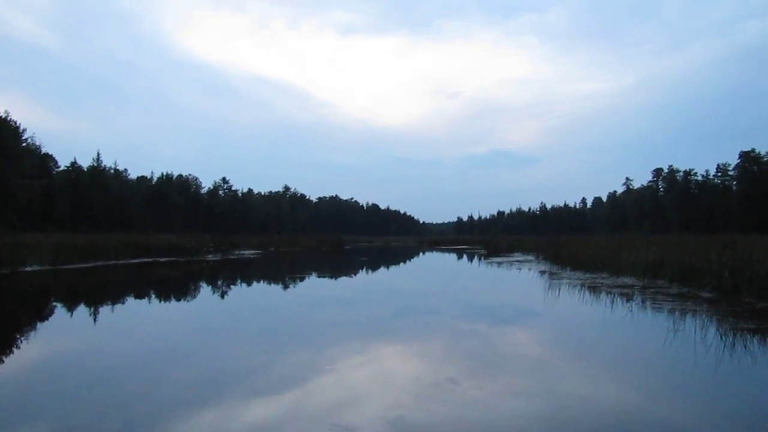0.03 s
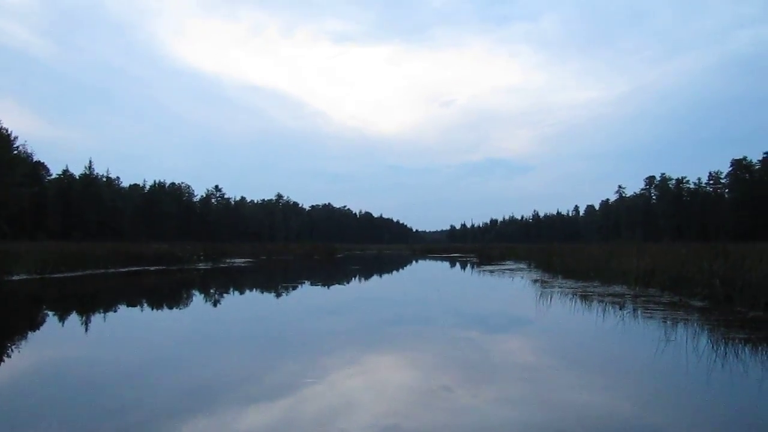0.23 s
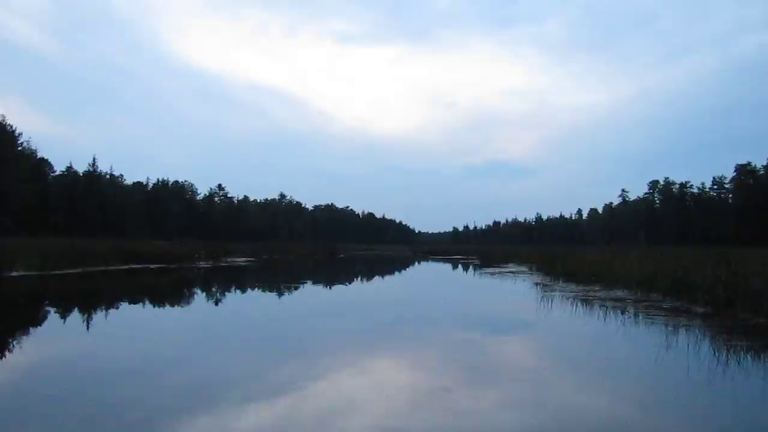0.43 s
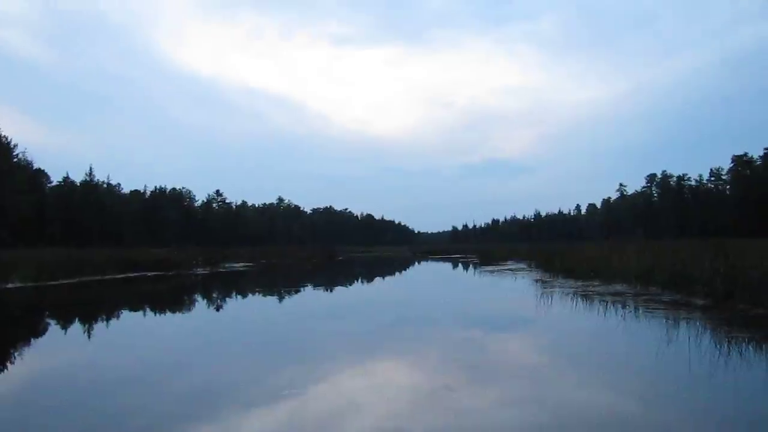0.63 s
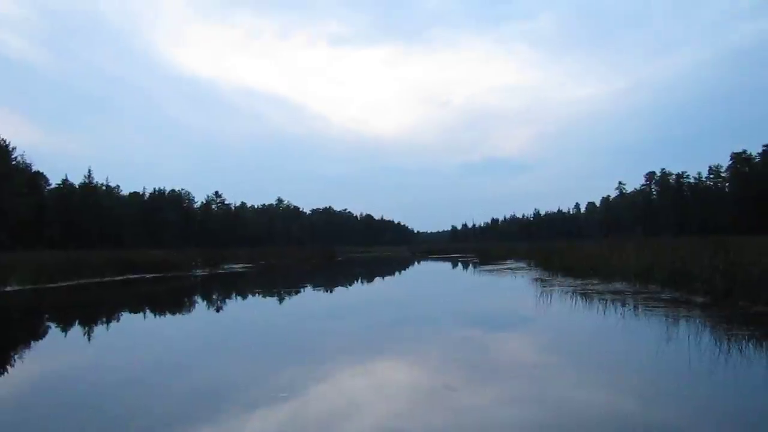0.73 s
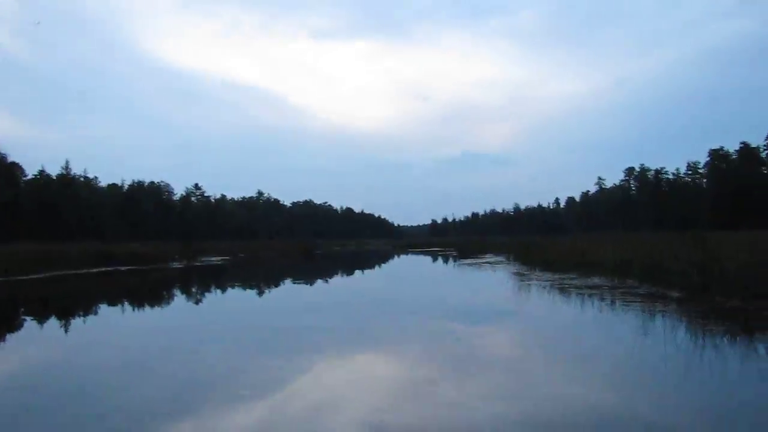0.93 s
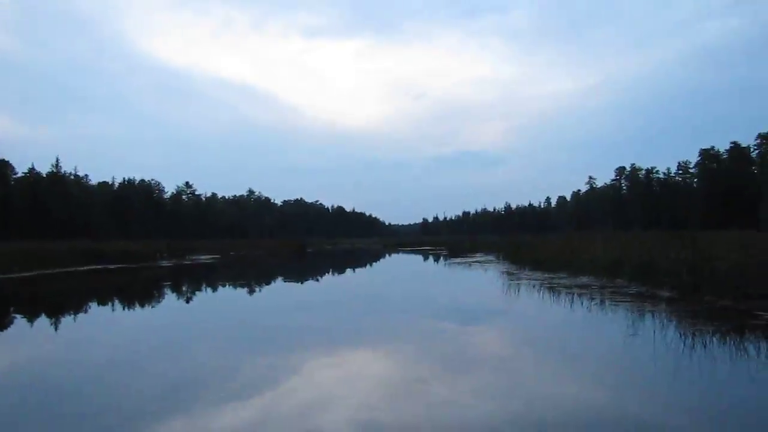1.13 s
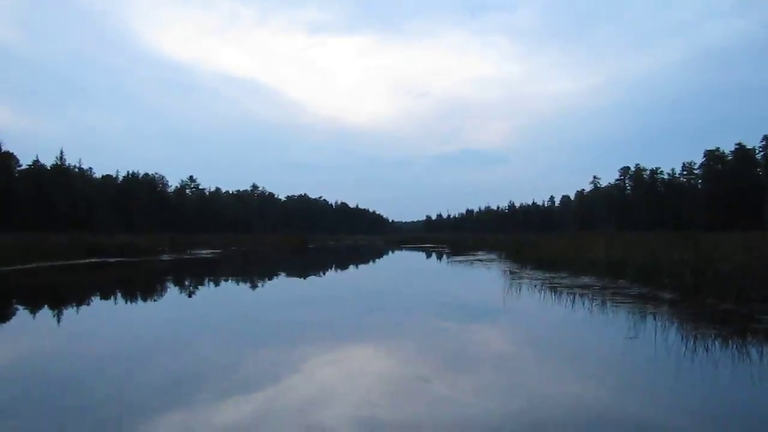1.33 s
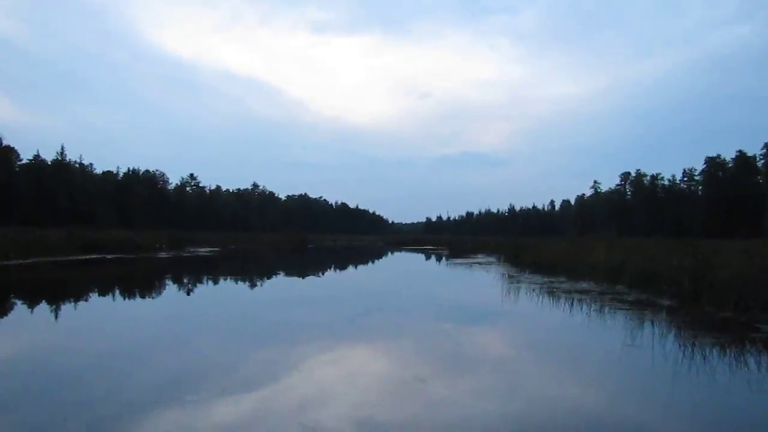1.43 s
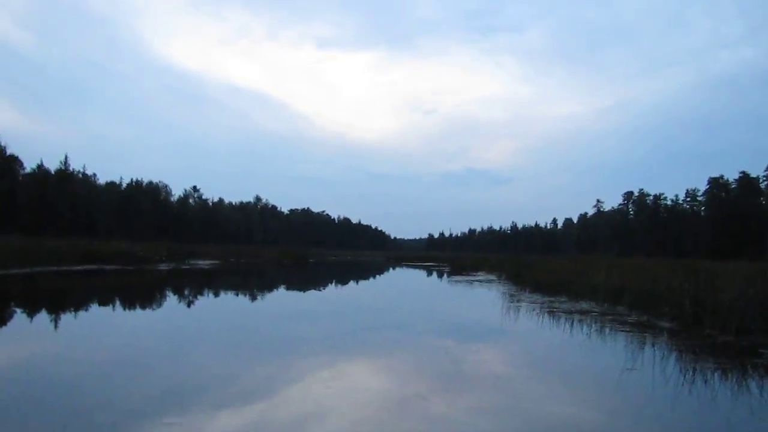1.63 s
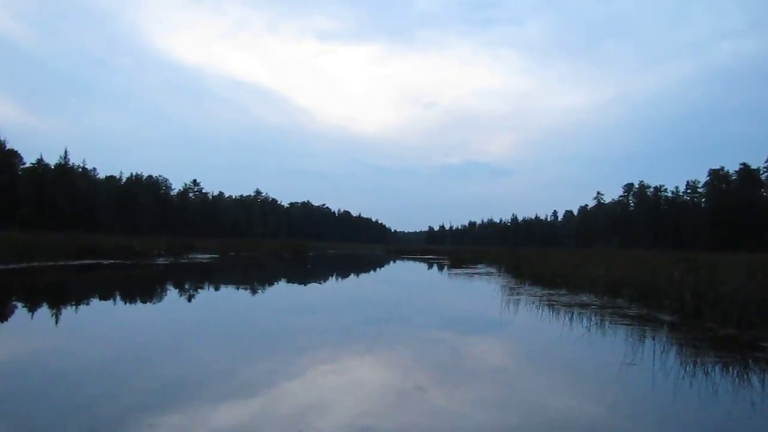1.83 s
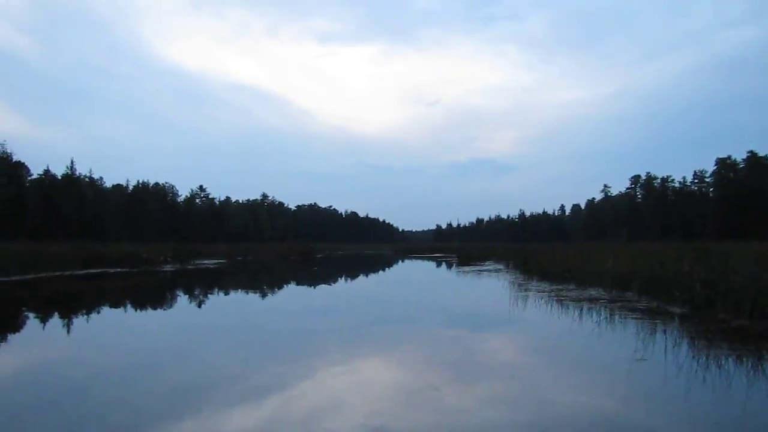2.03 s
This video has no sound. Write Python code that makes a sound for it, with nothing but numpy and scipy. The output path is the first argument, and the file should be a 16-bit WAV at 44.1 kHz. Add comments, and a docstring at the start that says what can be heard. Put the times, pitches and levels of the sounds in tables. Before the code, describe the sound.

A hard, hollow knock cracks close on the right at 0.35 seconds, amid grainy scuffs. Soft frog-like gulps follow at 0.5, then scattered clicks from 0.6. Dull slaps and more scuffs come around 1.4 and 1.7. Lake water laps softly near 1 second and from 1.5 to 1.8. A bird gives buzzy chirps at 0.7, 1.2 and 1.6. Distant whistles, high insect hiss and a low rumble continue throughout.

```python
"""Dusk on a still lake

Close by on the right, a hard knock cracks and rings hollow, among clicks, dull slaps and grainy scuffs.
Soft gulps, of a frog or of the water, sound ahead, and tiny bubbles ring as the water laps.
Birds whistle and buzz, echoed by the wooded shore. Under it all lie a low, distant rumble,
the hush of open air and a high hiss like insects, made of fast ticks and noise."""
import sys
import numpy as np
from scipy import signal
from scipy.fft import rfft, irfft, next_fast_len
from scipy.io import wavfile
from scipy.ndimage import map_coordinates

SR = 44100
rng = np.random.default_rng(int(sys.argv[2]) if len(sys.argv) > 2 else 0)


def master(y):
    """Save y as 16-bit WAV."""
    cut = np.clip(np.atleast_2d(y).T, -1, 1)
    pcm = np.round(cut * 32767)  # scale
    wavfile.write(sys.argv[1], SR, pcm.astype(np.int16))


N = 92610

# tone color of the steady sounds (f/Hz, level/dB per Hz)
RUMBLE_SPECTRUM = [(12, -110), (25, -104), (45, -88.5), (70, -81), (105, -80.5), (150, -86.5), (250, -89.5),
                   (450, -94.5), (800, -94.5), (1500, -108), (4000, -130)]
AIR_SPECTRUM = [(20, -108), (100, -91), (250, -92), (450, -91.5), (750, -91), (1100, -88.5), (1600, -92.5),
                (2700, -94.5), (3500, -95.5), (4700, -91), (5300, -93.5), (6000, -98), (7800, -102),
                (9500, -95.5), (11000, -107), (13500, -109), (15500, -115)]
INSECT_SPECTRUM = [(2000, -112), (3400, -94.5), (4100, -93.5), (4700, -83.5), (5450, -84), (5650, -80),
                   (5950, -101), (8100, -109), (8950, -94.5), (9500, -90.5), (10350, -88), (10700, -103),
                   (11600, -106), (13600, -111), (16300, -125)]
# notes of the far birds (t/s, length/s, start f/Hz, end f/Hz, level/dB)
SONG_NOTES = [(0, 0.08, 3450, 3320, -61.5), (.16, 0.25, 3050, 3480, -62), (.42, 0.11, 3560, 3620, -60),
              (0.776, 0.1, 3330, 3060, -60), (0.902, 0.07, 3160, 2970, -59),
              (1.17, 0.067, 2480, 2820, -61.5), (1.906, 0.18, 2370, 2441, -60),
              (1.967, 0.13, 3280, 3700, -61.5)]
# calls of the nearer bird (t/s, buzz level/dB, whistle level/dB)
CHIRPS = [(.668, -57, -65), (1.157, -43.5, -54), (1.628, -45.5, -57)]
# rubbing strokes (peak t/s, rise/s, fall/s, level/dB)
SCUFFS = [(.205, 0.034, 0.044, -52.5), (.252, 0.024, .018, -40.5), (.3, 0.018, .025, -51),
          (.352, 0.0035, 0.036, -46), (0.377, 0.02, 0.036, -39.5), (0.428, 0.013, 0.035, -46.5),
          (1.355, 0.015, 0.013, -40), (1.376, 0.0094, 0.024, -44), (1.665, 0.027, 0.041, -49),
          (1.78, 0.063, 0.079, -56.5)]
# when each hit lands and how hard (t/s, level/dB)
KNOCKS = [(.3449, 2.5)]
CLICKS = [(.6312, -14.5), (.6322, -13), (.853, -22.5), (.8953, -18), (.9595, -34), (.372, -23),
          (1.394, -19), (1.664, -19), (1.7055, -21.5)]
SLAPS = [(1.3711, -14.5), (1.3722, -21.5), (1.3742, -32), (1.3772, -19), (1.658, -23.5)]
# tone color of a scuff grain, the knock's crack, a click and a slap (f/Hz, relative level/dB)
SCUFF_SPECTRUM = [(150, -27), (450, -18.5), (720, -1), (980, 3), (1350, -3.5), (2000, 0.5), (3000, -3.5),
                  (4100, 1), (5200, -9), (6500, -18), (10000, -15.5), (15000, -47)]
CRACK_SPECTRUM = [(100, -47), (380, -24), (600, -16.5), (850, -8), (1250, -9.5), (1900, 1), (3700, 0),
                  (5400, -9.5), (7500, -28), (9200, -25), (11500, -44), (16000, -47)]
CLICK_SPECTRUM = [(150, -23), (600, -3), (850, -35), (1200, -2.5), (1450, -8), (1850, -3.5), (2500, -4.5),
                  (3200, -9), (3850, 4.5), (4600, -19), (7500, -19.5), (9800, -15), (12000, -37)]
SLAP_SPECTRUM = [(120, -22), (400, -20), (580, 2.5), (1150, 1.5), (1500, 2), (1900, -5), (2800, -12),
                 (4800, -8.5), (7000, -29), (15000, -30)]
# tones of the knock's hollow ring (f/Hz, relative level/dB, time to fade by 60 dB/s)
RING_TONES = [(821, -21, 0.016), (955, -23, 0.012), (2110, -23.5, 0.012), (2620, -21, 0.009),
              (3440, -50, .009)]
# gulping tones (t/s, length/s, start f/Hz, end f/Hz, level/dB)
GULPS = [(.47, 0.0466, 860, 1064, -52), (0.473, 0.024, 1290, 1370, -46), (0.473, 0.0057, 1050, 1100, -46.5),
         (.526, 0.014, 980, 766, -51.5), (.527, 0.024, 1380, 1300, -53), (0.538, 0.025, 1050, 1190, -55.5),
         (1.495, 0.013, 2080, 2060, -55), (1.755, 0.041, 660, 700, -56.5)]
# spells of lapping water (peak t/s, half width/s, level/dB)
LAPS = [(.93, 0.053, -64.5), (1.09, 0.032, -61.5), (1.54, 0.1, -57.5), (1.66, 0.049, -59.5),
        (1.78, 0.065, -57)]
# how much weaker the left ear hears hits and insects (f/Hz, level/dB)
HEAD_SHADOW = [(300, -14), (850, -9.5), (1800, -8), (2700, -0.5), (4200, -20.5), (9000, -12)]
INSECT_SHADOW = [(3000, -12), (4700, -12), (5400, -4), (9000, -2)]

NEAR_LAG_S, FAR_LAG_S = 0.00015, 0.00009  # left ear's delay for near and far sounds


def amp(db):
    """Turn decibels into a gain."""
    return 10 ** (np.asarray(db) / 20)


def unit(x):
    """Scale a sound to an average strength (rms) of 1."""
    return x / np.sqrt(np.mean(x ** 2) + 1e-20)


def gain_at(points, hz):
    """The gain at any frequency, read between (f/Hz, level/dB) points on a log axis."""
    f, db = np.transpose(points)
    return amp(np.interp(np.log(hz + 1), np.log(f + 1), db))


def wobble(rate):
    """A smooth curve through rate random values a second."""
    values = rng.standard_normal(int(N * rate / SR) + 4)
    return map_coordinates(values, [np.arange(N) * rate / SR])


def filtered(x, response):
    """Scale and delay each frequency of x as response(hz) says."""
    size = next_fast_len(N + SR // 2)
    return irfft(rfft(x, size) * response(np.fft.rfftfreq(size, 1 / SR)), size)[..., :N]


def snap(spectrum, size=2048):
    """A sudden pulse of energy 1 with this tone color."""
    cepstrum = irfft(np.log(gain_at(spectrum, np.fft.rfftfreq(size, 1 / SR))))
    cepstrum[1:size // 2] *= 2  # folding it in half packs the energy at the pulse's start
    cepstrum[size // 2 + 1:] = 0
    pulse = irfft(np.exp(rfft(cepstrum)))
    return pulse / np.linalg.norm(pulse)


def add(track, s, sound):
    """Mix a sound into a track at s seconds."""
    i = max(0, round(s * SR))
    track[..., i:i + sound.shape[-1]] += sound[..., :max(0, N - i)]


def from_right(x, shadow, lag_s):
    """A sound on the right reaches the left ear later and weaker."""
    left = filtered(x, lambda hz: gain_at(shadow, hz) * np.exp(-2j * np.pi * hz * lag_s))
    return np.array([left, x])


def echoes(x, fade_s, size):
    """Many reflections smear x into a stereo tail that drops 60 dB in fade_s."""
    tail = rng.standard_normal((2, size)) * amp(-60 * np.arange(size) / SR / fade_s)
    tail /= np.linalg.norm(tail, axis=1, keepdims=True)
    return signal.fftconvolve(x[None], tail, axes=1)[:, :N]


def glide(s, length, start_hz, end_hz, rough_hz, peak=0.38):
    """A sliding, slightly unsteady tone, loudest at the fraction peak of its length."""
    progress = np.clip((np.arange(N) / SR - s) / length, 0, 1)
    hz = start_hz + (end_hz - start_hz) * progress + rough_hz * wobble(700)
    swell = np.sin(np.pi / 2 * np.interp(progress, [0, peak, 1], [0, 1, 0]))
    return np.sqrt(2) * swell * np.sin(2 * np.pi * np.cumsum(hz) / SR)


def hits(rows, pulse, shadow, scatter_db):
    """One pulse a row from the right; nearby surfaces scatter each one."""
    direct, scatter = np.zeros(N), np.zeros((2, N))
    for s, db in rows:
        add(direct, s, amp(db) * pulse)
        add(scatter, s + 0.000704, amp(db + scatter_db) * echoes(pulse, fade_s=0.022, size=2048))
    return from_right(direct, shadow, NEAR_LAG_S) + scatter * amp([[-5], [0]])


def colored(x, spectrum, pitch=1):
    """Give plain noise a tone color; a pitch below 1 moves it down."""
    return filtered(x, lambda hz: np.sqrt(SR / 2) * gain_at(spectrum, hz / pitch))


def evening_air():
    """A rumble alike in both ears and open air all round, both wavering a little."""
    rumble = colored(rng.standard_normal((1, N)), RUMBLE_SPECTRUM) * amp(0.53 * wobble(12.24))
    air = colored(rng.standard_normal((2, N)), AIR_SPECTRUM) * amp(0.69 * wobble(8.4))
    return rumble + air


def insects(pairs_per_s=147.2, jitter_s=0.00002, backstroke_db=-10, tick_share=0.32, sag=0.035):
    """Fast strong-weak ticks and noise in two shrill bands, plus a thin tone; the pitch slowly sags."""
    progress = np.arange(N) / N
    stroke = np.arange(int(2 * pairs_per_s * N / SR))
    slip, spread_db = rng.standard_normal((len(stroke), 2)).T
    tick_s = stroke / (2 * pairs_per_s) + jitter_s * slip
    tick_at = np.clip(np.round(tick_s * SR), 0, N - 1).astype(int)
    ticks = unit(np.bincount(tick_at, amp(backstroke_db * (stroke % 2) + spread_db), N))
    rasp = np.sqrt(tick_share) * ticks + np.sqrt(1 - tick_share) * rng.standard_normal(N)
    early, late = [colored(rasp, INSECT_SPECTRUM, pitch) for pitch in (1, 1 - sag)]
    whine_hz = 5350 * (1 - sag * progress) + 74.7 * wobble(500)
    whine = amp(-62) * np.sqrt(2) * np.sin(2 * np.pi * np.cumsum(whine_hz) / SR)
    chorus = (1 - progress) * early + amp(-1.5) * progress * late + whine
    return from_right(chorus * amp(0.38 * wobble(6.95)), INSECT_SHADOW, FAR_LAG_S)


def birds(flutter_db=3.5, trill_hz=145.7, buzz_s=0.0297):
    """Far song, and a nearer bird's rising buzz and falling whistle; the wooded shore echoes them."""
    song = sum(amp(db) * glide(*note, rough_hz=41.6) for *note, db in SONG_NOTES)
    far = from_right(song * amp(flutter_db * wobble(59.05)), [(3000, -6)], FAR_LAG_S)
    flip = np.sin(np.pi * trill_hz * np.arange(N) / SR) ** 2  # the buzz flips between two pitches
    near = np.zeros(N)
    for s, buzz_db, whistle_db in CHIRPS:
        lower = glide(s, buzz_s, 5060, 6160, rough_hz=174, peak=0.69)
        upper = glide(s, buzz_s, 7380, 7650, rough_hz=174, peak=0.69)
        near += amp(buzz_db) * (flip ** 2 * lower + amp(-5) * (1 - flip) ** 2 * upper)
        near += amp(whistle_db) * glide(s + 0.051, 0.072, 6730, 5350, rough_hz=89, peak=0.47)
    calls = amp(-3.5) * far + amp(-12) * near
    shore = np.array([echoes(calls[ear], fade_s=0.2, size=22050)[ear] for ear in (0, 1)])
    return far + near * amp([[-1], [0]]) + shore


def scuffs(grains_per_s=2500, spread_db=3.5, shared=0.44, left_db=-7.5):
    """Rubbing makes crowds of tiny clicks, in strokes that swell and fade."""
    t = np.arange(N) / SR
    power = sum(amp(db) ** 2 * np.exp(-2 * ((t - s) / np.where(t < s, rise, fall)) ** 2)
                for s, rise, fall, db in SCUFFS)
    grains = (rng.random((3, N)) < grains_per_s / SR) * rng.choice([-1, 1], (3, N))
    grains = grains * amp(spread_db * rng.standard_normal((3, N)))
    rub = unit(signal.fftconvolve(grains, snap(SCUFF_SPECTRUM)[None], axes=1)[:, :N])
    both_ears, each_ear = from_right(rub[0], [(1000, 0)], NEAR_LAG_S), rub[1:]
    stereo = np.sqrt(shared) * both_ears + np.sqrt(1 - shared) * each_ear
    return np.sqrt(power) * stereo * amp([[left_db], [0]])


def knock(ring_delay_s=0.00044, ring_rise_s=0.0012):
    """A hard crack, then a hollow ring that dies almost at once."""
    crack = snap(CRACK_SPECTRUM)
    t = np.maximum(np.arange(len(crack)) / SR - ring_delay_s, 0)
    ring = sum(amp(db - 60 * t / fade_s) * np.sin(2 * np.pi * hz * t) for hz, db, fade_s in RING_TONES)
    ring *= 1 - np.exp(-t / ring_rise_s)
    return hits(KNOCKS, crack + ring, HEAD_SHADOW, scatter_db=-10.5)


def clicks():
    """Small hits, each one short bright pulse."""
    return hits(CLICKS, snap(CLICK_SPECTRUM), HEAD_SHADOW, scatter_db=-6.5)


def gulps():
    """Short bubbling tones, the same in both ears, so they sound straight ahead."""
    tones = sum(amp(db) * glide(*note, rough_hz=59.4, peak=0.34) for *note, db in GULPS)
    return np.array([tones, tones])


def lapping(bubbles_per_s=500, middle_hz=1096, octaves=2.18, ring_cycles=4.6):
    """The water stirs up crowds of tiny bubbles, each ringing briefly at its own pitch."""
    t, age = np.arange(N) / SR, np.arange(1024) / SR
    power = sum(amp(db) ** 2 * np.exp(-2 * ((t - s) / width) ** 2) for s, width, db in LAPS)
    water = np.zeros((2, N))
    for when, pitch, strength, side in rng.random((int(bubbles_per_s * N / SR), 4)):
        cycles = middle_hz * 2 ** (octaves * (pitch - 0.5)) * age
        rise_and_fade = (1 - np.exp(-2 * cycles)) * np.exp(-2 * cycles / ring_cycles)
        bubble = strength ** 2 * rise_and_fade * np.sin(2 * np.pi * cycles)
        add(water, when * N / SR, np.sqrt([[side], [1 - side]]) * bubble)
    return np.sqrt(power) * unit(water)


def slaps():
    """Duller hits, with less treble and more scatter."""
    return hits(SLAPS, snap(SLAP_SPECTRUM), shadow=[(800, -11), (4000, -24)], scatter_db=0.5)


def scene():
    """Everything heard from the water's edge."""
    close_by = knock() + clicks() + slaps() + scuffs()
    return close_by + gulps() + lapping() + birds() + insects() + evening_air()


def record(dry):
    """Cut away the very highest treble."""
    return filtered(dry, lambda hz: hz < 15730)


dry = scene()
out = record(dry)
master(out)
```